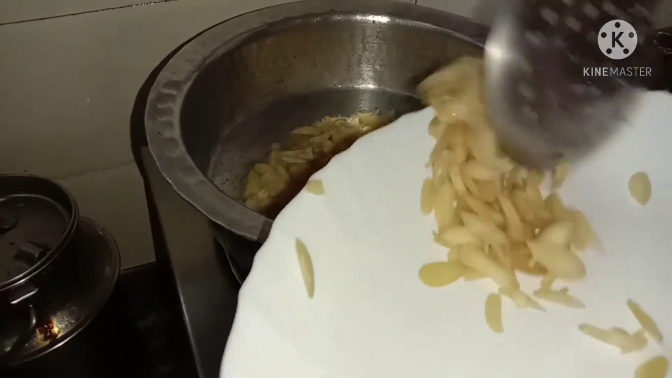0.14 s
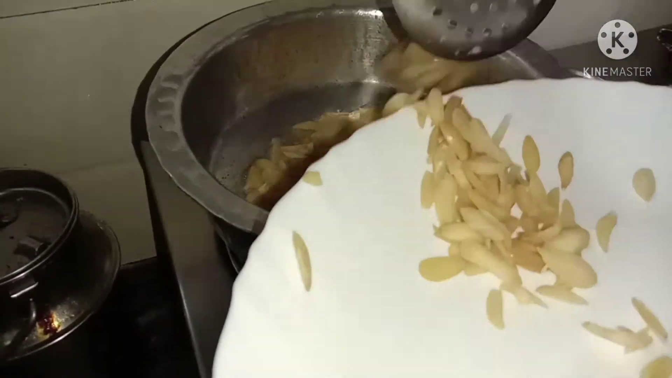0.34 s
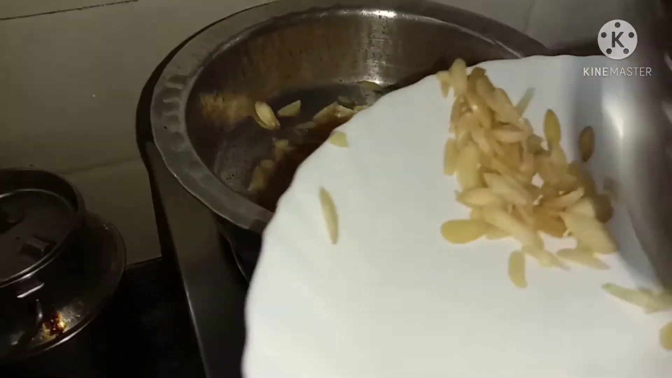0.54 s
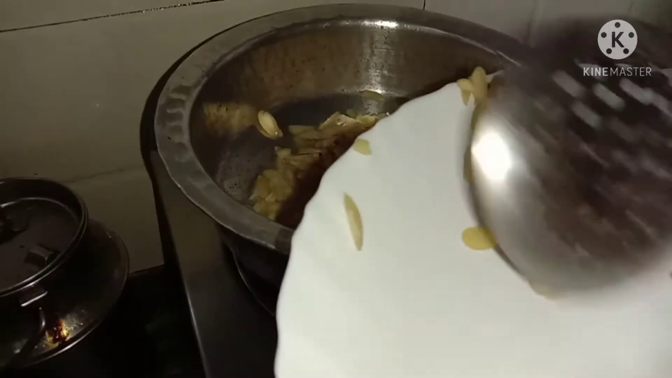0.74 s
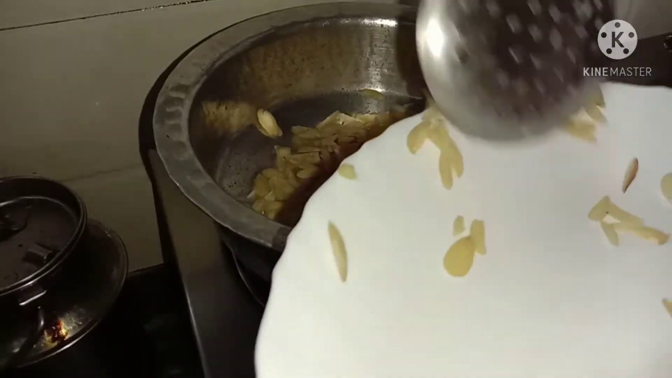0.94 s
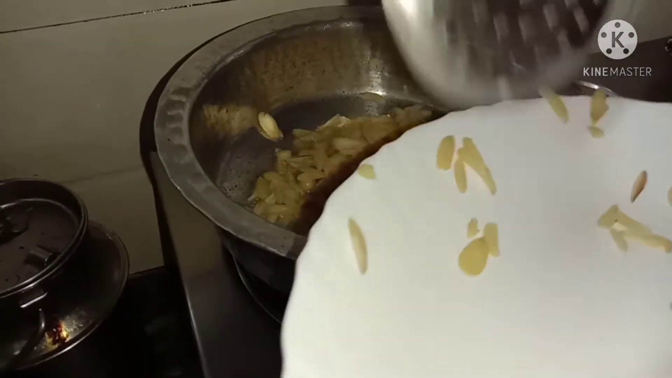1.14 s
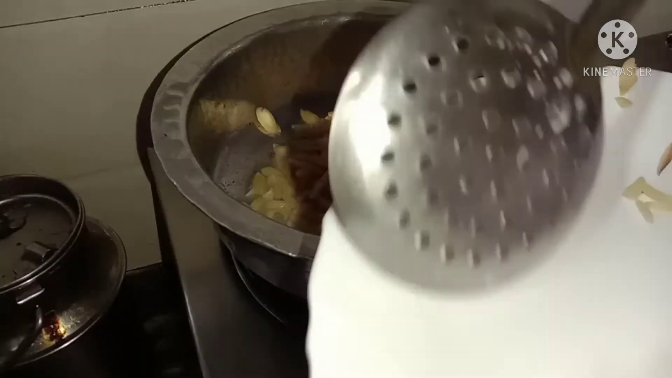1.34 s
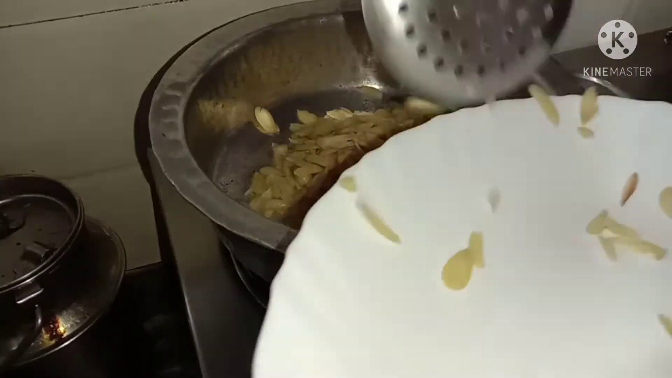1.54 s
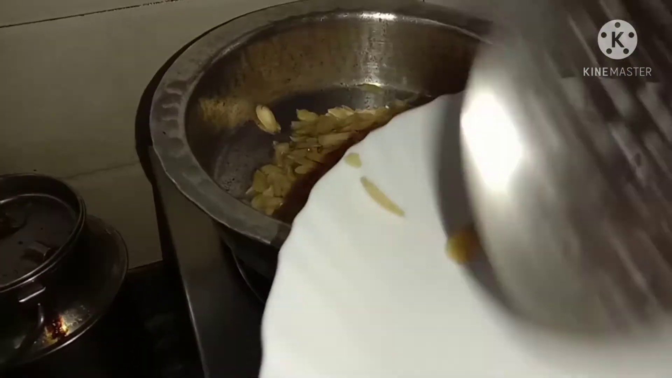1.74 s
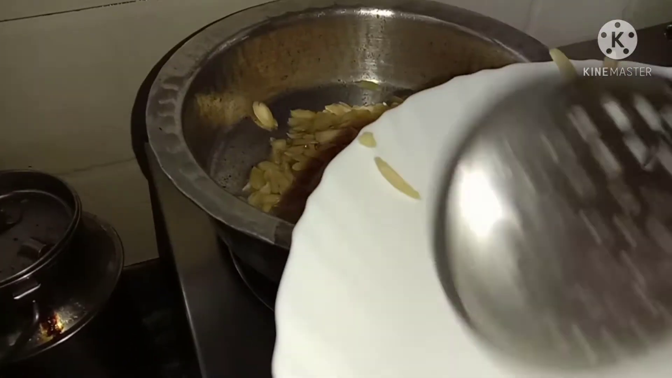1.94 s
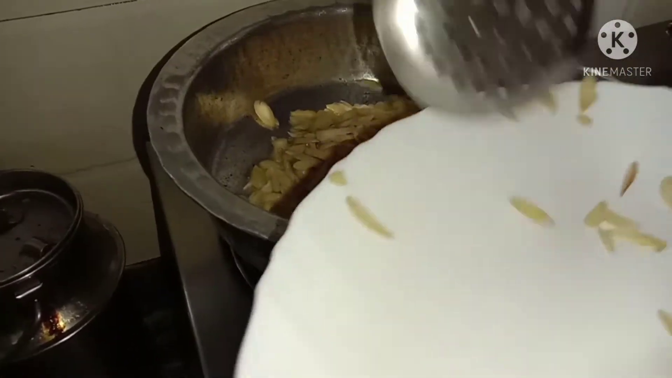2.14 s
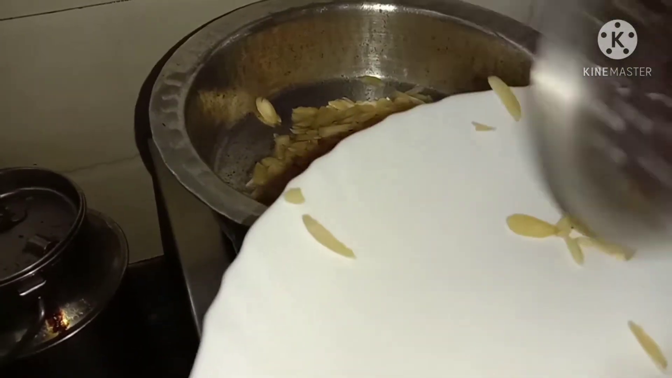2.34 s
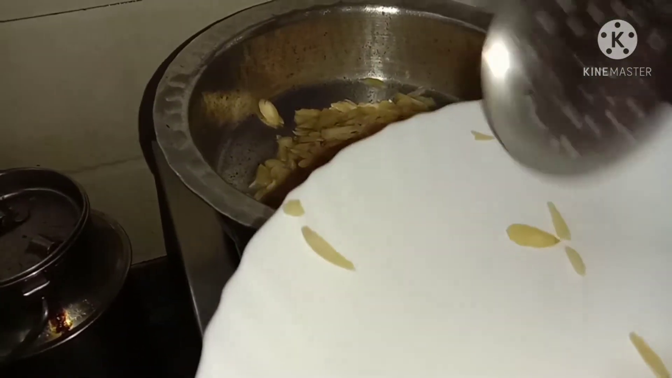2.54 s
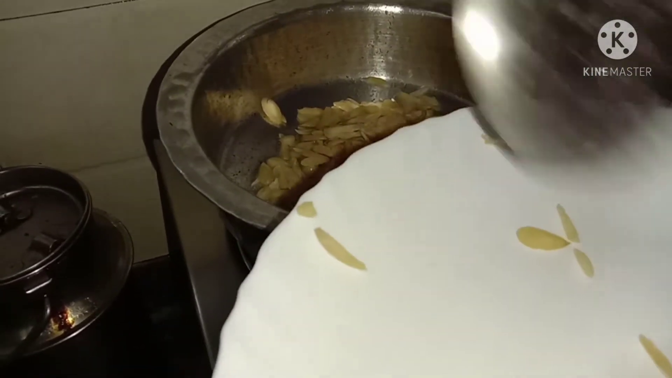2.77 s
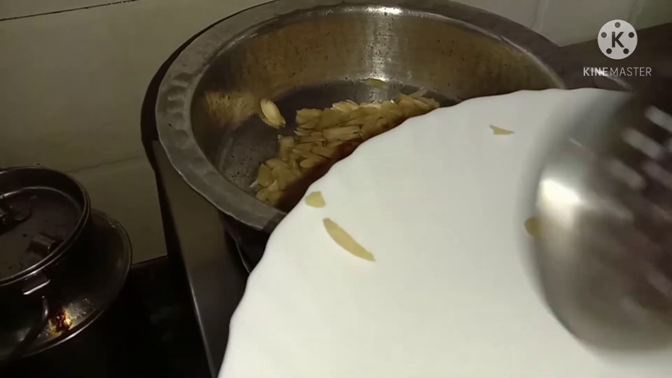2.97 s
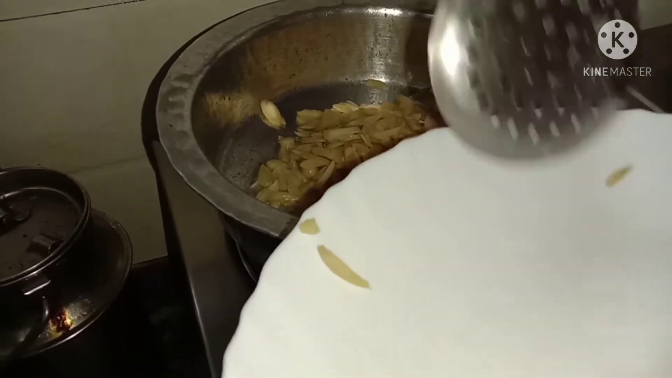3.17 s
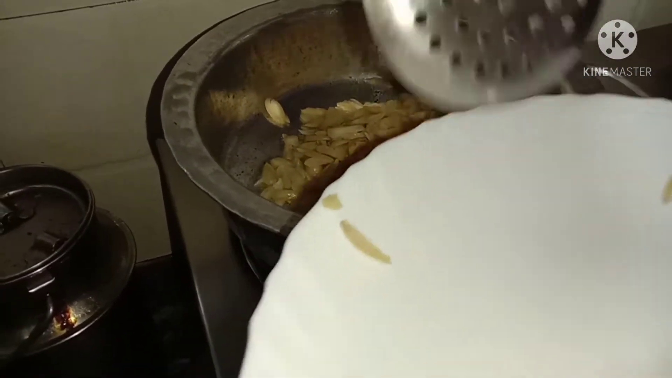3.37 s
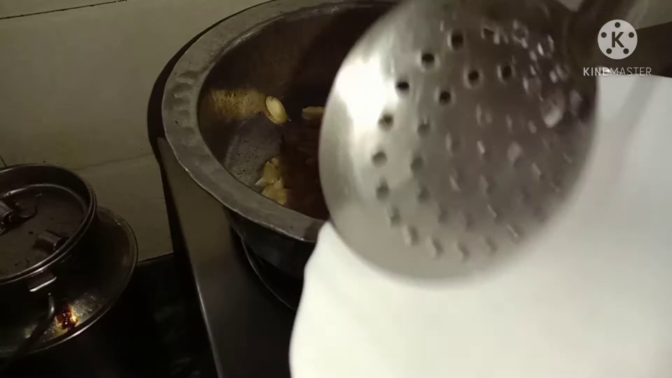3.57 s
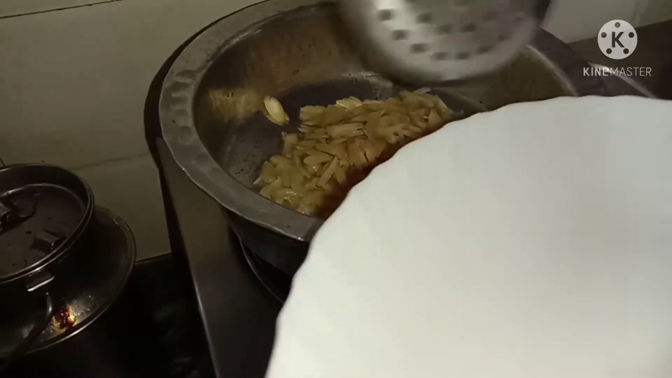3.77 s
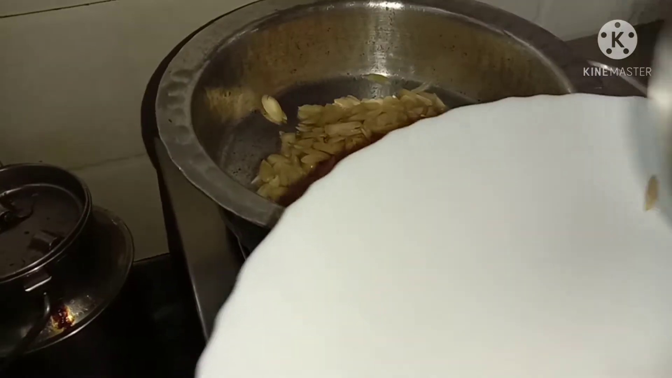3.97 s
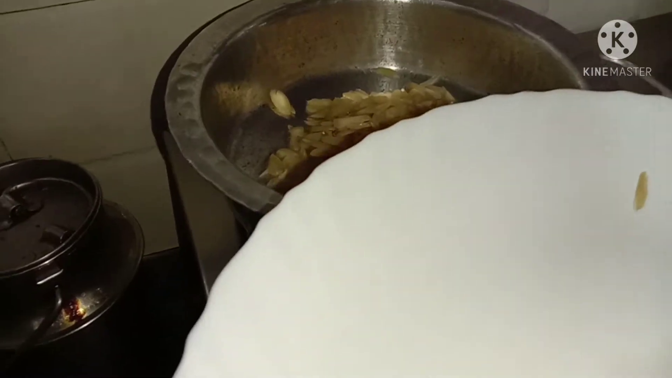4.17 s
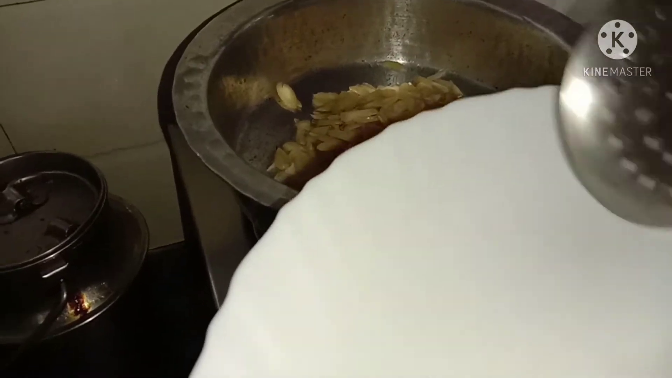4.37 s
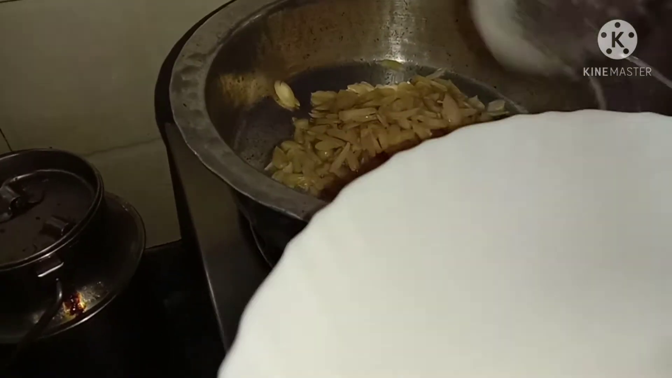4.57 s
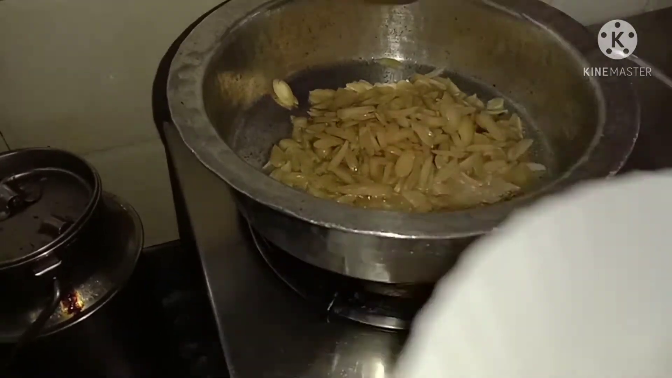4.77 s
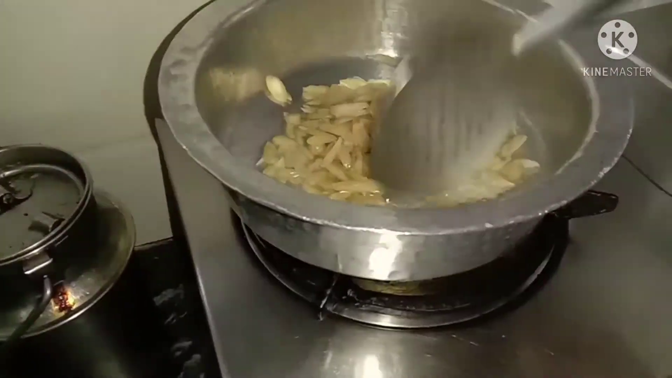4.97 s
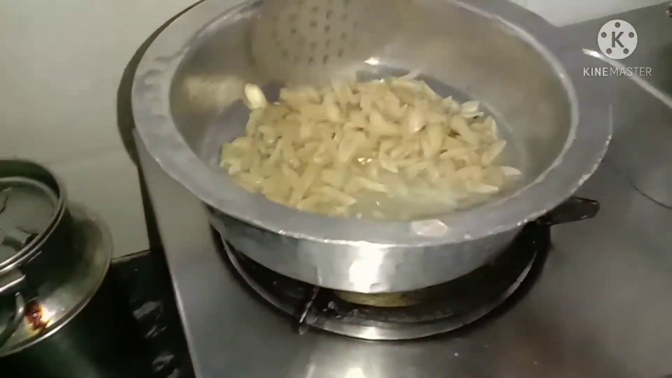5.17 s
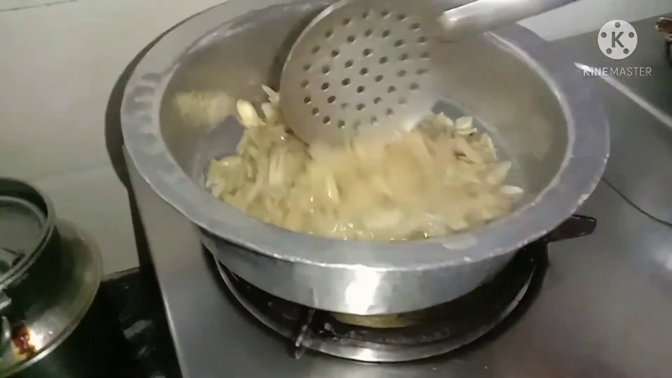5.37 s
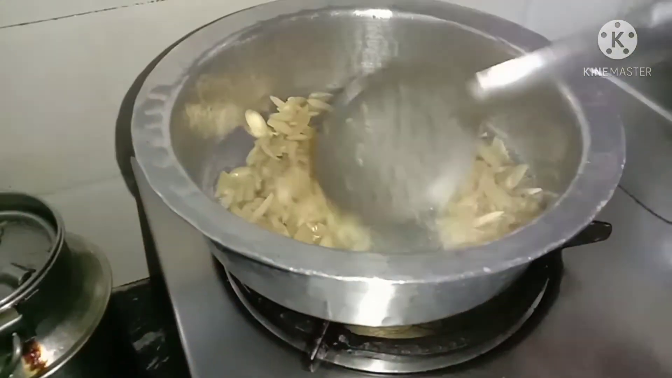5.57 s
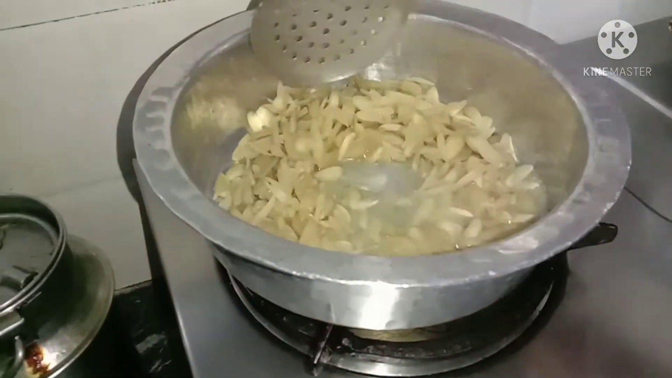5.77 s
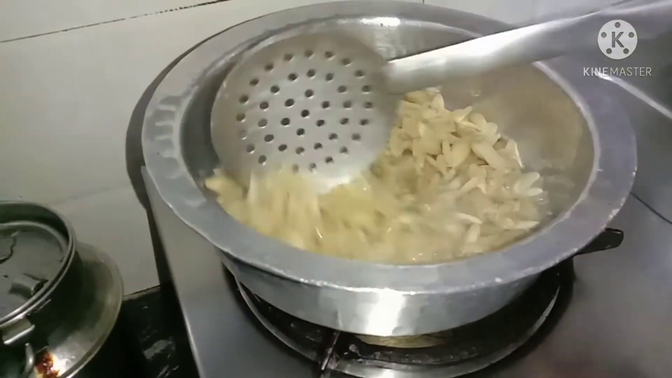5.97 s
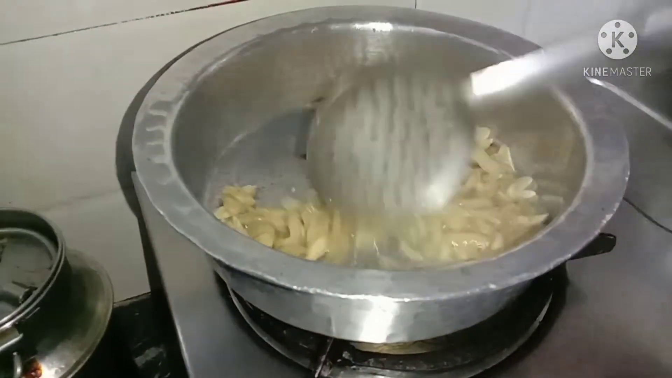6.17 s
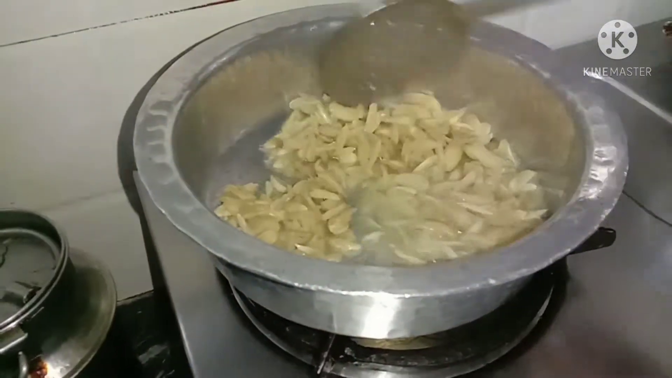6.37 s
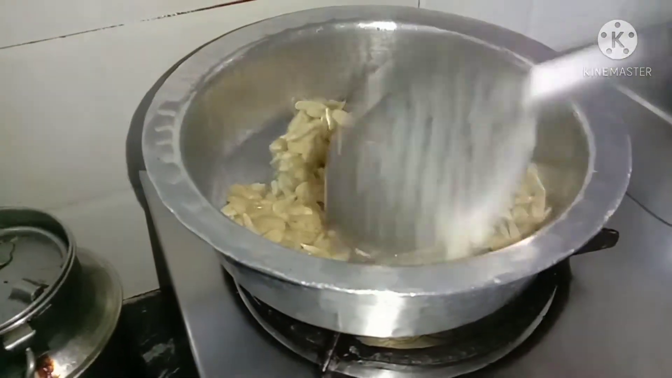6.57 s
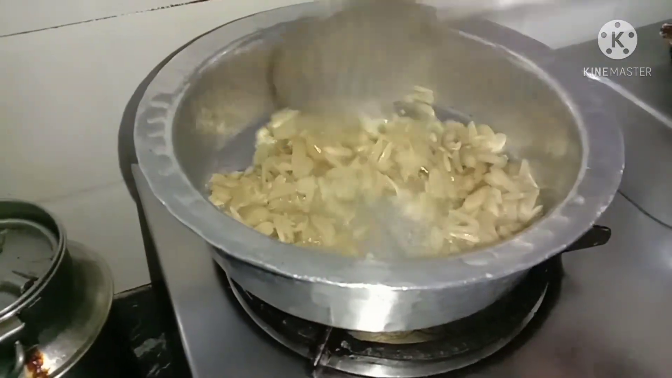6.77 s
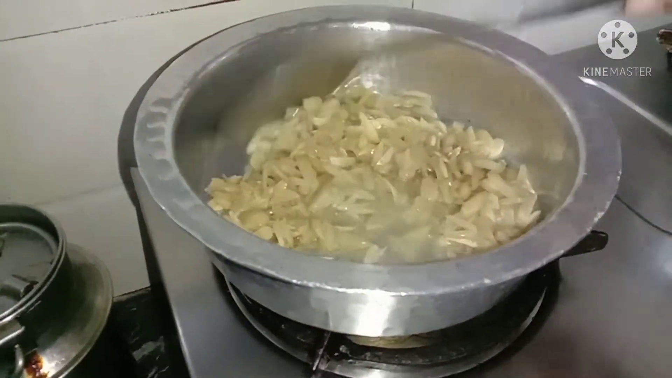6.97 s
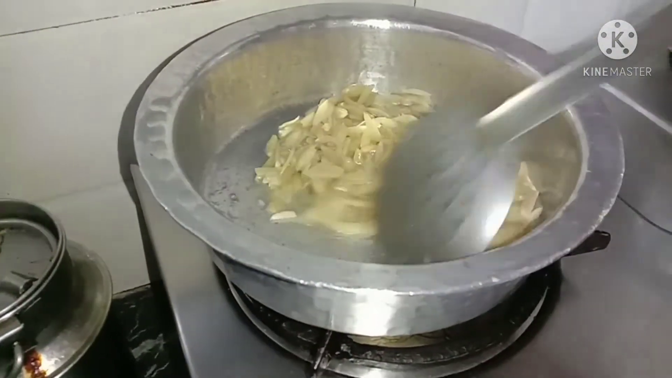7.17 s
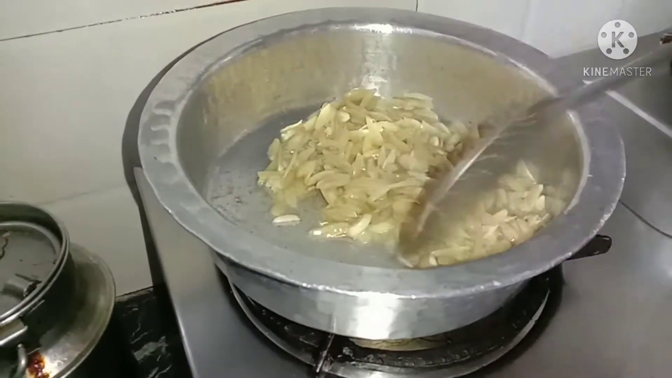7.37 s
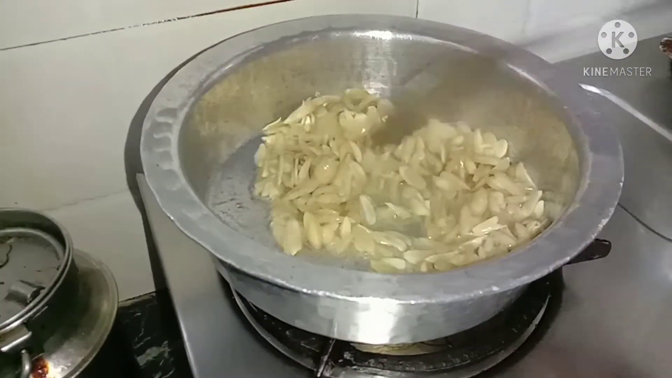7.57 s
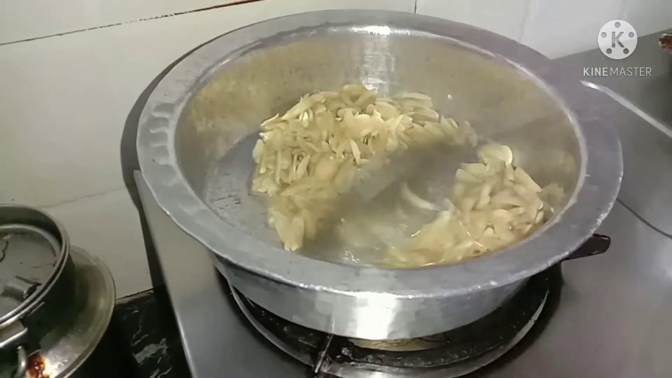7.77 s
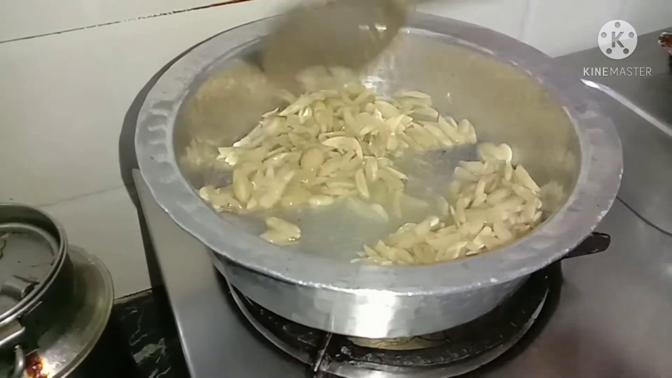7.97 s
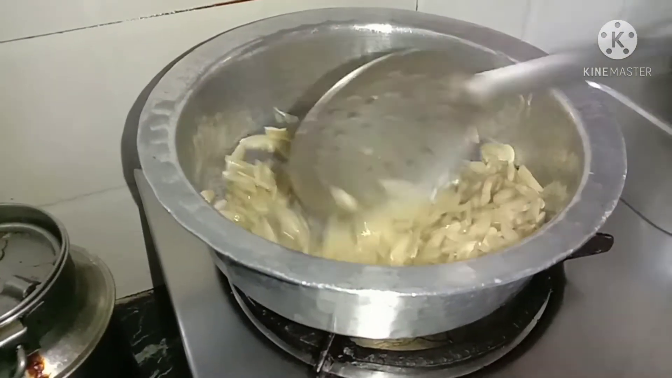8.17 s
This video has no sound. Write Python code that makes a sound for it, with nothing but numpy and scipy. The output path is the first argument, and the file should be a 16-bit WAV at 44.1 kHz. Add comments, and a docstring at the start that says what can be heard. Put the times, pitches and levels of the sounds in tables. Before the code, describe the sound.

A close microphone in a small tiled kitchen picks up hot fat crackling briskly, with random wet pops, dry ticks and a fine bright spray above a faint, low gas-burner flutter. A steel spoon strikes a plate in loud, sharp, ringing clacks at about 0.6, 1.3, 1.9, 2.1, a double hit at 2.4, then 2.9, 3.5 and 4.4 s; the sizzle ducks briefly around the hard blows. Smaller rim knocks fall between, near 0.3, 1.5, 2.6, 3.2, 3.7 and 4.5 s, some rattling the pot on its stand. The frying weakens around 3 s and swells again from 5 s, slightly muffled by nuts. Soft, low shoves begin at 5.3 s. At 6.0 s a very hard, dull bottom blow leads into a short scrape. Lighter wall knocks follow every third of a second or so, with quick scrapes and a tiny metallic groan near 7.0 s, and a last knock and scrape at 8.0 s.

```python
"""A small tiled kitchen: sliced nuts are pushed off a plate into a metal pot of hot ghee and stirred.
The fat crackles as random clicks and noise coloured like bursting bubbles, over the low noise of a gas burner.
A slotted steel spoon clacks on the plate, knocks the pot and scrapes it: coloured noise bursts and ringing modes.
It shoves the nuts in soft rumbles and makes the pot groan briefly.
The microphone is close, and its limiter ducks the sizzle around each hard blow."""
import sys
import numpy as np
from scipy import signal
from scipy.fft import rfft, irfft
from scipy.io import wavfile
from scipy.ndimage import uniform_filter1d, minimum_filter1d

SR = 44100
rng = np.random.default_rng(int(sys.argv[2]) if len(sys.argv) > 2 else 0)


def generate_wav(signal):
    """Clip the signal to [-1, 1] and save it as 16-bit WAV at the path in sys.argv[1]."""
    frames = np.transpose(np.atleast_2d(signal))
    scaled = np.clip(frames, -1, 1) * 32767
    pcm = np.round(scaled).astype(np.int16)
    wavfile.write(sys.argv[1], SR, pcm)


N = 362061
TIME = np.arange(N) / SR  # s
TOP_HZ = 15650  # upper limit of the microphone

# Gas flame over time. Each row: time in seconds, level in dB.
FLAME_LEVEL = [(0, -45), (.6, -46), (1.05, -43.5), (1.9, -46), (2.4, -49.5), (2.8, -42), (3.8, -47),
               (8.2, -53)]
# Colour of the flame. Each row: frequency in Hz, gain in dB.
FLAME_COLOUR = [(25, -98), (60, -17.5), (100, -2), (160, 2.5), (260, -3.5), (450, -14), (1000, -0.5),
                (4000, -109)]
# How hard the fat boils; it dies down after the nuts drop in and revives with stirring.
# Each row: time in seconds, level in dB.
BOIL_LEVEL = [(0.0, -21.5), (3.06, -26.5), (3.18, -29.5), (4.85, -29.5), (5.65, -21.5), (6.38, -21.5),
              (7.89, -23), (8.21, -21)]
# Colour of bursting bubbles in the pot. Each row: frequency in Hz, gain in dB.
FAT_COLOUR = [(250, -41), (550, -25.5), (1270, -9), (1480, -11), (2200, -2), (2800, -0.5), (3300, -4),
              (4000, -11.5), (6800, -9.5), (8000, -26), (9800, -16.5), (13700, -13), (15000, -0.5),
              (16000, -3.5)]
# The loudest spits. Each row: start in seconds, relative level in dB, pitch in Hz.
LOUD_SPITS = [(0.026, -8.5, 1830), (0.164, -7, 3130), (0.243, -9.5, 1940), (0.395, 1, 2680),
              (0.817, -6.5, 2900), (1.037, -12, 3200), (1.212, -8, 2560), (1.462, -9, 3320),
              (1.694, -11, 3000), (2.253, -15, 6530), (2.283, -11, 2940), (2.879, -14, 1320),
              (3.505, -12.5, 3000), (4.849, -15, 3500), (4.994, -6, 2300), (5.333, -12.5, 1940),
              (5.449, -8.5, 2600), (5.478, -11, 2680), (5.776, -8.5, 3700), (6.255, -9, 2480),
              (6.46, -7.5, 2800), (6.732, -8, 2720)]
# Colour of the contact crack. Each row: frequency in Hz, gain in dB.
CRACK_COLOUR = [(50, -21.5), (150, 2.5), (400, 3), (700, 3), (1300, 0.5), (2000, 4.5), (2900, 9), (4200, 0),
                (7000, 1.5), (8200, -12), (11000, -9.5), (15500, -22)]
# Colour of the pot rocking on its stand. Each row: frequency in Hz, gain in dB.
STAND_COLOUR = [(50, -38), (120, -10.5), (220, 3.5), (340, -6.5), (650, 2), (950, -2), (1500, -4.5),
                (3000, -47), (9000, -72)]
# Ringing modes of the plate, the spoon, the pot's wall and the pot's bottom.
# Each row: frequency in Hz, relative level in dB, time to fall 60 dB in seconds.
PLATE_MODES = [(1265, 5, .05), (1712, -6, .24), (2765, 0, .26), (2810, 0, .25), (3235, -1, .3),
               (3285, -6, .27), (3835, -13, .28), (4240, -5, .28), (4430, -8, .22), (5495, -5, .28),
               (5935, -12, .33), (7125, -11, .22), (8670, -19, .18), (11500, -23, .2)]
SPOON_MODES = [(952, -2, .3), (1570, -11, .2), (2700, -3, .22), (3410, -7, .22), (3991, -3, .42),
               (4820, -6, .22), (5755, -2, .26), (5897, -6, .45), (6490, -10, .22), (6785, -6, .34),
               (7720, -18, .4), (9370, -15, .28), (9755, -15, .4), (10945, -12, .5), (11186, -15, .38),
               (13520, -24, .35)]
WALL_MODES = [(612, -17, .28), (1285, -14, .15), (1787, -4, .3), (2400, -9, .15), (3090, 2, .28),
              (3120, -6, .25), (4030, -10, .25), (4620, -9, .22), (5170, -13, .2), (5810, -12, .2),
              (6670, -15, .16), (11130, -24, .2)]
BOTTOM_MODES = [(705, -17, .15), (855, -5, .2), (915, -9, .15), (965, -3, .2), (1717, -5, .18),
                (2734, 3, .22), (4780, -14, .15), (5940, -17, .15)]
# Where the spoon meets the pot. Each row: spoon, wall and bottom ring in dB over the crack,
# brightness in dB per octave, top of the crack in Hz.
ON_RIM = (-18, -27, -19.5, -1.5, 5000)
ON_WALL = (-38, -14, -42, 1.5, 4500)
ON_BOTTOM = (-61, -51, -26.5, -1.5, 1797)
ON_NUTS = (-69, -39, -52, -4, 2200)
# Spoon in the pot. Each row: start in seconds, crack in dB, stand in dB, place of contact (a row above).
POT_KNOCKS = [(0.266, -10.5, -48, ON_RIM), (0.272, -17, -53, ON_RIM), (1.499, -19, -58, ON_RIM),
              (2.613, -11, -15.5, ON_RIM), (2.723, -21, -25, ON_NUTS), (3.162, -10, -12.5, ON_RIM),
              (3.677, -8, -34, ON_RIM), (4.539, -8, -16.5, ON_RIM), (5.538, -4.5, -39, ON_NUTS),
              (5.966, 19, -51, ON_BOTTOM), (6.301, -7, -31, ON_WALL), (6.602, -3, -58, ON_WALL),
              (6.88, -11.5, -37.5, ON_WALL), (7.03, -9.5, -18, ON_WALL), (7.331, -4.5, -31.5, ON_WALL),
              (7.729, -4, -30.5, ON_NUTS), (8.012, -13.5, -24.5, ON_WALL)]
# Spoon on the plate. Each row: start in seconds, then crack, thump, plate ring and spoon ring in dB.
PLATE_TAPS = [(0.6444, 9, -8.5, -8, -18), (1.2932, 5.5, -17, -16, -17.5), (1.8651, 5.5, -0.5, -12.5, -16.5),
              (2.0677, -1.5, -17.5, -64, -22), (2.416, 8, -4, -2.5, -24), (2.422, 11, -1, -25, -30),
              (2.4630, -21, -37, -22.5, -39), (2.946, 8, -5, -7, -15.5), (3.5435, 8, -1, -13, -16.5),
              (4.3556, 10.5, 3, -4, -30.5)]
# Spoon shoving the heap of nuts. Each row: start in seconds, length in seconds, level in dB.
NUT_SHOVES = [(5.256, 0.082, -40.5), (5.538, 0.071, -39.5), (5.82, 0.066, -40.5), (6.915, 0.29, -47),
              (7.363, 0.074, -45.5), (7.746, 0.043, -46)]
# Spoon dragged through the pot. Each row: start and length in seconds, then wall, bottom and stand in dB.
POT_SCRAPES = [(5.975, 0.31, -52, -32.5, -73), (6.909, 0.099, -26.5, -28.5, -34),
               (7.036, 0.076, -36, -64, -37), (8.021, 0.079, -26, -38, -33.5)]
# Spoon chattering on the wall. Each row: start in seconds, length in seconds, level in dB.
WALL_GROANS = [(7.024, 0.04, -29.5), (7.065, 0.076, -32)]


def undb(db):
    """Decibels to gain."""
    return 10 ** (np.asarray(db) / 20)


def unit(x, span=None):
    """Scale to rms 1, over the first span seconds if given."""
    return x / np.sqrt(np.mean(x[:int(span * SR) if span else None] ** 2))


def add(out, start, x):
    """Mix x in from a start time in seconds."""
    i = int(start * SR)
    out[i:i + len(x)] += x[:N - i]


def fade(t, t60):
    """Exponential decay that falls 60 dB in t60 seconds."""
    return np.exp(-np.log(1000) * t / t60)


def stroke_shape(length):
    """Swell and fall of one spoon stroke, length in seconds."""
    return signal.windows.tukey(int(length * SR), .4)


def cut(x, hz, side, order):
    """Low-pass or high-pass."""
    return signal.sosfilt(signal.butter(order, hz, side, fs=SR, output="sos"), x)


def colour(x, points, size=4096):
    """Minimum-phase filter through (Hz, dB) points, so that attacks stay sharp."""
    hz, db = np.transpose(points)
    bins = np.fft.rfftfreq(size, 1 / SR)
    gain = undb(np.interp(np.log(bins + 1), np.log(hz), db))
    # folding the cepstrum makes the filter causal
    cepstrum = irfft(np.log(gain))
    cepstrum[1:size // 2] *= 2
    cepstrum[size // 2 + 1:] = 0
    impulse = irfft(np.exp(rfft(cepstrum)))
    return signal.fftconvolve(x, impulse)[:len(x)]


def resonate(x, hz, q):
    """One broad resonance, gain 1 at its centre."""
    return signal.lfilter(*signal.iirpeak(min(hz, TOP_HZ), q, fs=SR), x)


def walk(rate):
    """Random wavering, spread near 1, through rate new values per second."""
    knots = rng.standard_normal(4096)
    return np.interp(TIME * rate, np.arange(len(knots)), knots)


def clicks(rate, spread_db, range_db):
    """Random clicks; positive spread makes a few louder up to range_db, negative a few fainter."""
    sizes = undb(np.minimum(spread_db * rng.exponential(size=N), range_db))
    struck = rng.random(N) < rate / SR
    return struck * sizes * rng.choice([-1, 1], N)


def burst(points, t60, span):
    """A dense, dying rattle: fading noise of the given colour."""
    t = TIME[:SR // 2]
    noise = rng.standard_normal(len(t)) * fade(t, t60)
    return unit(colour(noise, points), span)


def ring(modes, bright_db=0):
    """A struck round object: each mode is a close, beating pair, weighted by chance at each blow."""
    hz, db, t60 = np.transpose(np.repeat(modes, 2, axis=0))[:, :, None]
    t = TIME[:SR * 3 // 4]
    luck, detune, phase = rng.standard_normal((3, len(hz), 1))
    gain = undb(db + 2 * luck + bright_db * np.log2(hz / SR))  # bright_db is per octave
    tones = np.sin(2 * np.pi * ((hz + 10 * detune) * t + phase))
    return unit((gain * tones * fade(t, t60)).sum(axis=0), .05)


def kitchen(x, t60=.25, wet_db=-12):
    """Tiled walls close by give a short, dense tail of fading noise."""
    t = TIME[:SR // 2]
    tail = rng.standard_normal(len(t)) * fade(t, t60) * (t > .002)
    echo = signal.fftconvolve(x, tail / np.linalg.norm(tail))[:N]
    return x + undb(wet_db) * echo


def flame():
    """The gas burner's turbulence gives a low, fluttering noise."""
    noise = unit(colour(rng.standard_normal(N), FLAME_COLOUR))
    level_db = np.interp(TIME, *np.transpose(FLAME_LEVEL))
    waver_db = 1.5 * walk(rate=7.3)
    return noise * undb(level_db + waver_db)


def boil(t):
    """How hard the fat boils at the given times, in dB."""
    return np.interp(t, *np.transpose(BOIL_LEVEL))


def sizzle():
    """Steam bubbles burst in the fat: pitched pips, dry ticks and a fine spray, coming in flurries."""
    crackle_db = 2  # over the boil
    spray_db, spray_follow = -13.5, 0.89  # offset in dB, and dB gained per dB of boil
    muffle_hz, muffle_share = 6250, 0.26
    pips = sum(resonate(clicks(rate=240, spread_db=5.0, range_db=26), hz, q=2.9)
               for hz in np.geomspace(800, 14000, num=12))
    ticks = clicks(rate=1500, spread_db=-1.0, range_db=13.5)
    hiss = rng.standard_normal(N)
    fat = unit(pips) + unit(ticks) * undb(-3.5) + hiss * undb(1.0)
    crackle = cut(unit(colour(fat, FAT_COLOUR)), 9630, "low", order=4)
    # the tiniest bubbles snap as sharp, separate ticks
    sharp = unit(clicks(rate=330, spread_db=8, range_db=38))
    snaps = unit(ticks) + sharp + rng.standard_normal(N) * undb(-30)
    spray = unit(cut(colour(snaps, FAT_COLOUR), 5000, "high", order=4))
    boil_db = boil(TIME)
    flurry = undb(2.12 * walk(rate=36))
    crackle = crackle * undb(boil_db + crackle_db)
    spray = spray * undb(spray_follow * boil_db + spray_db)
    frying = flurry * (crackle + spray)
    # stirred nuts spread over the fat between 5 and 5.8 s and muffle its upper crackle from then on
    muffle = np.interp(TIME, (5.0, 5.8), (0, muffle_share))
    return frying - muffle * resonate(frying, muffle_hz, q=3.3)


def chance_spits():
    """Smaller spits (s, relative dB, Hz) by chance, more often and louder the harder the fat boils."""
    peak_rate = 11  # spits per second when the boil peaks
    over_boil_db, scatter_db = 8.5, 1.8
    middle_hz, scatter_octaves = 3300, .5
    start, luck = rng.random((400, 2)).T * [[TIME[-1]], [1]]
    size, pitch = rng.standard_normal((len(start), 2)).T
    level_db = boil(start) + over_boil_db + scatter_db * size
    hz = middle_hz * 2 ** (scatter_octaves * pitch)
    rate = peak_rate * undb(boil(start) - boil(TIME).max())
    happens = luck < rate * TIME[-1] / len(start)
    return list(np.transpose([start, level_db, hz])[happens])


def spits():
    """Large bubbles crack open or a nut drops into the fat; each spatters for a few milliseconds."""
    out, t = np.zeros(N), TIME[:SR // 20]
    for start, db, hz in list(LOUD_SPITS) + chance_spits():
        push = rng.standard_normal(len(t)) * np.exp(-t / 0.0016)
        pop = colour(resonate(push, hz, q=2.5) + 0.083 * push, FAT_COLOUR)
        add(out, start, unit(pop, .004) * undb(db - 4))
    return out


def rattle():
    """The pot hits its stand once, then settles with a quick, weak chatter."""
    hit = cut(burst(STAND_COLOUR, t60=0.04, span=0.0024), 370, "high", order=2)
    chatter = burst(STAND_COLOUR, t60=0.31, span=0.028)
    return hit + chatter * undb(-12.5)


def knocks():
    """The spoon meets the pot or the nuts: a crack, ringing modes, and a rattle on the stand."""
    out = np.zeros(N)
    for start, crack_db, stand_db, place in POT_KNOCKS:
        spoon_db, wall_db, bottom_db, bright_db, top_hz = place
        # the light spoon gives little bass, and nuts caught under it dull the contact
        crack = cut(burst(CRACK_COLOUR, t60=0.016, span=0.004), 1500, "high", order=2)
        add(out, start, undb(crack_db) * cut(crack, top_hz, "low", order=2))
        add(out, start, undb(stand_db) * rattle())
        for modes, db in (SPOON_MODES, spoon_db), (WALL_MODES, wall_db), (BOTTOM_MODES, bottom_db):
            add(out, start, undb(crack_db + db) * ring(modes, bright_db))
    return out


def thump(start_hz=210, end_hz=66, fall=0.0065, decay=0.0052):
    """The hand-held plate flexes: a short falling tone, as its slow, low bending waves come last."""
    t = TIME[:SR // 5]
    hz = end_hz + (start_hz - end_hz) * np.exp(-t / fall)  # fall and decay in s
    tone = np.sin(2 * np.pi * np.cumsum(hz) / SR)
    return unit(tone * np.exp(-t / decay), 0.0019)


def upper_modes(count=16):
    """Thin steel's crowded upper modes (Hz, dB, t60 s); each blow wakes a different handful."""
    place, strength = rng.random((count, 2)).T
    return np.transpose([4000 + 10000 * place, -12 * strength, np.full(count, .25)])


def taps():
    """The spoon hits the plate to shake the nuts off; the clack is close, the ringing fills the room."""
    tilt_per_db = 0.097  # dB per octave for each dB that the spoon outrings the plate
    ring_tilt_db = 0.16  # dB per octave: steel on the hard plate favours the upper modes
    upper_db = -10.5  # upper modes, relative to the spoon's ring
    clack, ringing = np.zeros((2, N))
    for start, crack_db, thump_db, plate_db, spoon_db in PLATE_TAPS:
        bright_db = tilt_per_db * (spoon_db - plate_db)
        crack_colour = [(hz, db + 0.44 * bright_db * np.log2(hz)) for hz, db in CRACK_COLOUR]
        crack = burst(crack_colour, t60=0.024, span=0.0043)
        add(clack, start, undb(crack_db) * crack)
        add(clack, start, undb(thump_db) * thump())
        add(ringing, start, undb(plate_db) * ring(PLATE_MODES, bright_db + ring_tilt_db))
        add(ringing, start, undb(spoon_db) * ring(SPOON_MODES, bright_db + ring_tilt_db))
        add(ringing, start, undb(spoon_db + upper_db) * ring(upper_modes()))
        # a crowd of weak upper modes blurs into a short shimmer
        shimmer = cut(burst(CRACK_COLOUR, t60=.2, span=.05), 1600, "high", order=3)
        add(ringing, start, (undb(plate_db) + undb(spoon_db)) * undb(-11) * shimmer)
    return clack + undb(-2) * kitchen(ringing, t60=.2, wet_db=-9)


def shoves():
    """Soft nuts tumble ahead of the spoon and drum on the bottom: low-passed clicks that rumble softly."""
    out = np.zeros(N)
    tumble = clicks(rate=400, spread_db=-0.5, range_db=5)
    tumble = cut(tumble, 90, "high", order=2)
    tumble = cut(tumble, 363, "low", order=4)
    for start, length, db in NUT_SHOVES:
        stroke = stroke_shape(length)
        rumble = stroke * tumble[int(start * SR):][:len(stroke)]
        add(out, start, undb(db) * unit(rumble))
    return out


def scrapes():
    """The spoon's edge sticks and slips, clicking into the metal's modes; its pressure damps them."""
    wall_tilt, bottom_tilt = -10, -4  # dB per octave
    out = np.zeros(N)
    for start, length, wall_db, bottom_db, stand_db in POT_SCRAPES:
        slips = clicks(rate=380, spread_db=-1.5, range_db=24.5)[:SR // 2]
        slips = slips * np.pad(stroke_shape(length), (0, SR))[:len(slips)]
        wall = WALL_MODES[1:], wall_db, wall_tilt  # without the lowest mode
        bottom = BOTTOM_MODES, bottom_db, bottom_tilt
        for modes, db, bright_db in (wall, bottom):
            metal = ring(modes, bright_db)
            metal = metal * np.exp(-TIME[:len(metal)] / 0.024)
            add(out, start, undb(db) * unit(signal.fftconvolve(slips, metal), length))
        stand = cut(colour(slips, STAND_COLOUR), 700, "high", order=2)
        add(out, start, undb(stand_db) * unit(stand, length))
    return out


def groans():
    """Stick and slip lock on to the lowest mode of the wall and give a short, unsteady tone."""
    out = np.zeros(N)
    hz = WALL_MODES[0][0] * (1 + 0.0201 * walk(rate=150))
    tone = np.sin(2 * np.pi * np.cumsum(hz) / SR) * undb(2.0 * walk(rate=140))
    for start, length, db in WALL_GROANS:
        stroke = stroke_shape(length)
        groan = stroke * tone[int(start * SR):][:len(stroke)]
        add(out, start, undb(db) * unit(groan))
    return out


def scene():
    """The pot stands by the wall; the plate is held close to the microphone."""
    in_pot = sizzle() + spits() + knocks() + shoves() + scrapes() + groans()
    pot = kitchen(in_pot, t60=0.027, wet_db=-12.5)
    return (flame() + pot + taps())[None]


def limiter(x, ceiling_db, release_db_per_s=190):
    """Turns down just ahead of each peak and comes back at a steady rate."""
    over = np.maximum(20 * np.log10(np.abs(x) + 1e-9) - ceiling_db, 0)
    release = release_db_per_s * TIME
    held = np.maximum.accumulate(over + release) - release
    # both windows look ahead, so the level eases down before the peak
    reach = int(.007 * SR)
    early = -minimum_filter1d(-held, 2 * reach + 1, origin=-reach)
    turn_down_db = uniform_filter1d(early, 2 * reach + 1, origin=-reach)
    return x * undb(-turn_down_db)


def record(dry):
    """The microphone loses deep bass; peaks are limited and rounded, and the top is cut."""
    heard = cut(dry[0], 55, "high", order=4)
    rounded = np.tanh(limiter(heard, ceiling_db=1.5))
    top_cut = signal.ellip(10, .2, 70, TOP_HZ, fs=SR, output="sos")
    return signal.sosfilt(top_cut, rounded)[None]


dry = scene()
out = record(dry)
generate_wav(out)
```